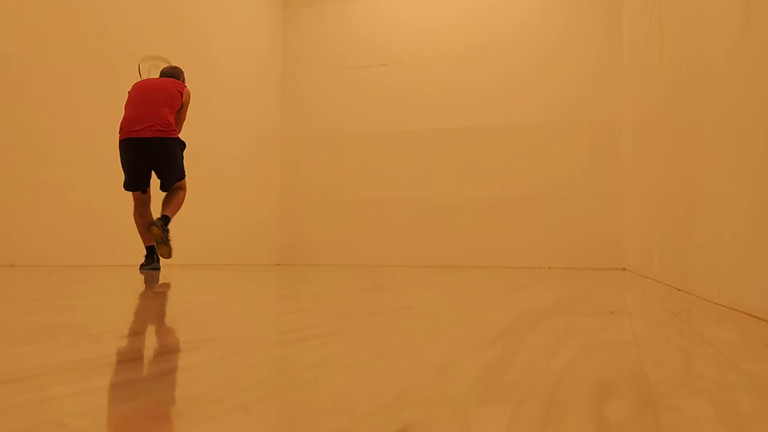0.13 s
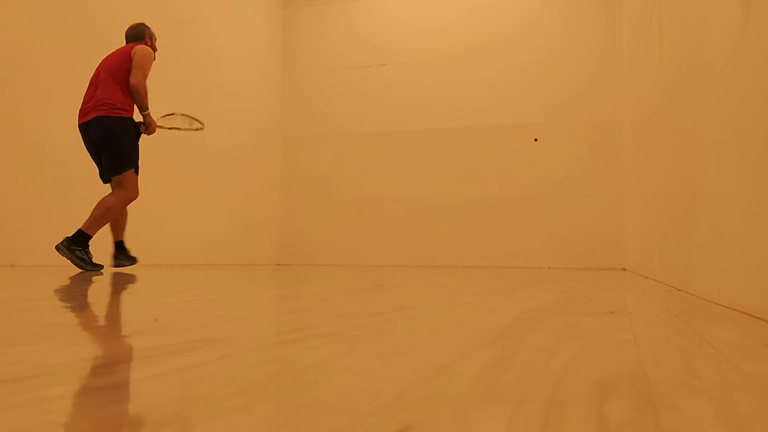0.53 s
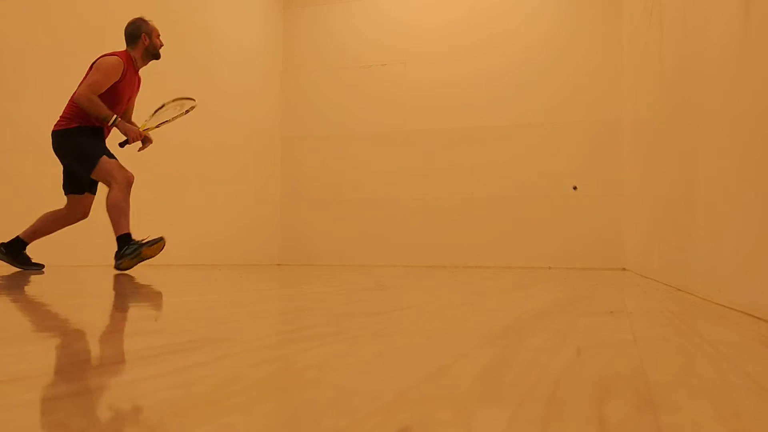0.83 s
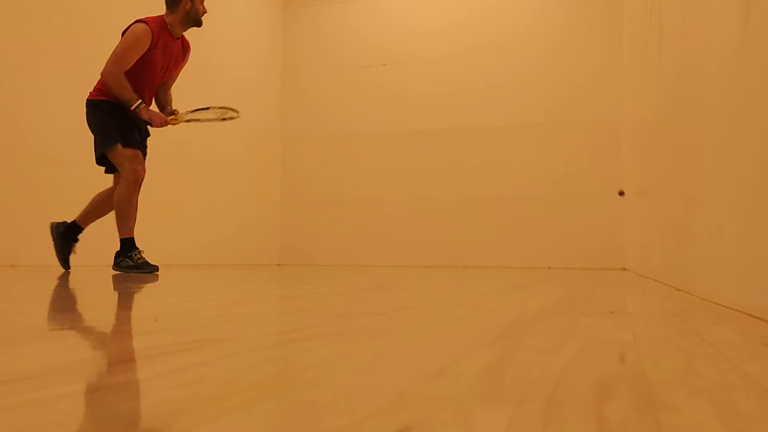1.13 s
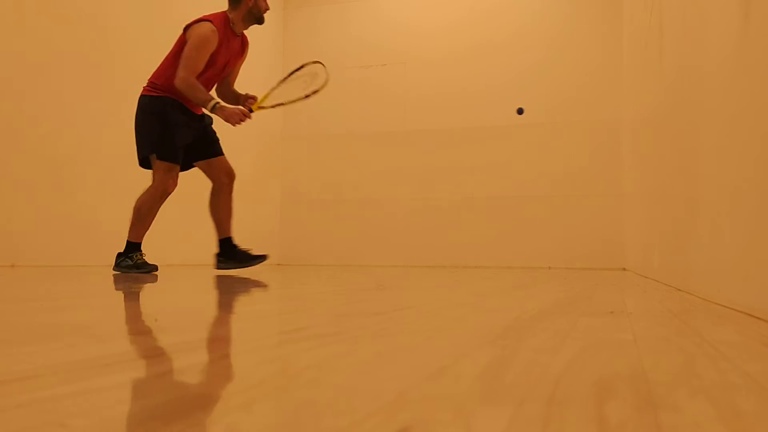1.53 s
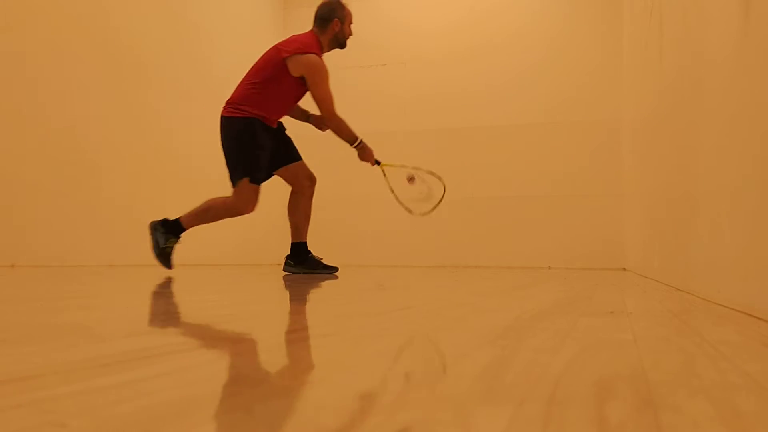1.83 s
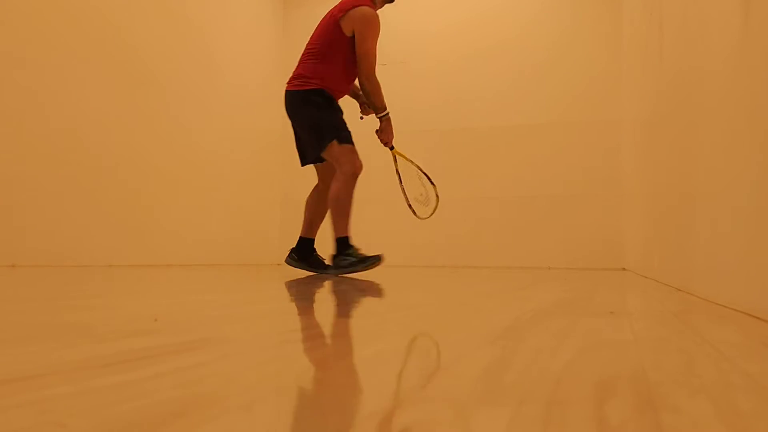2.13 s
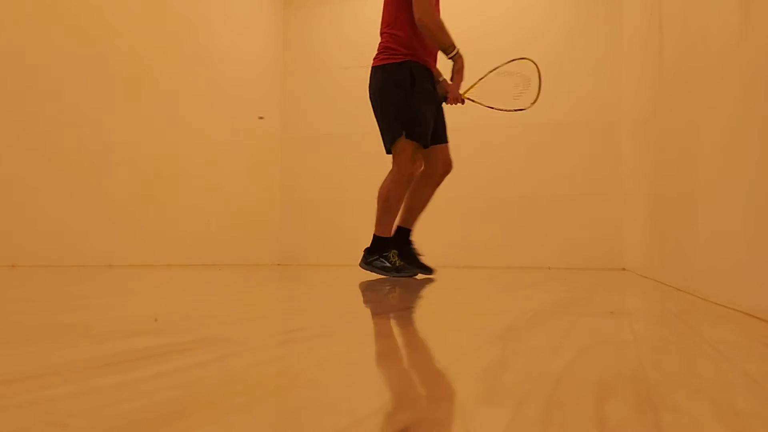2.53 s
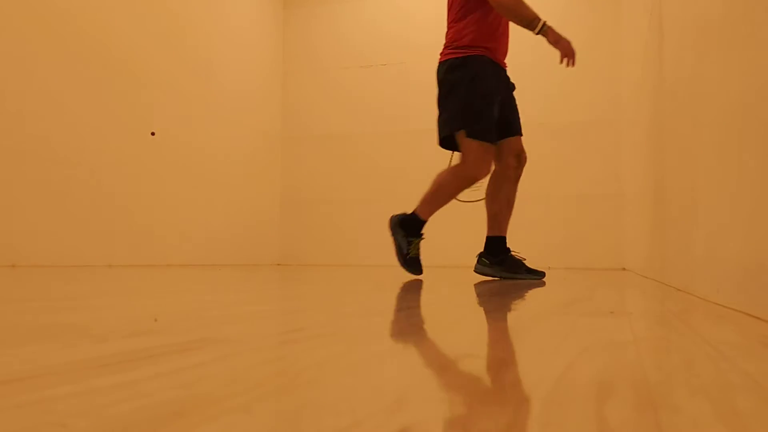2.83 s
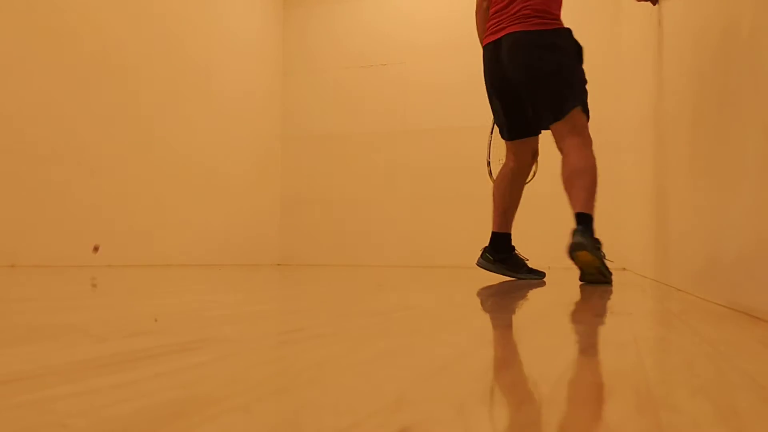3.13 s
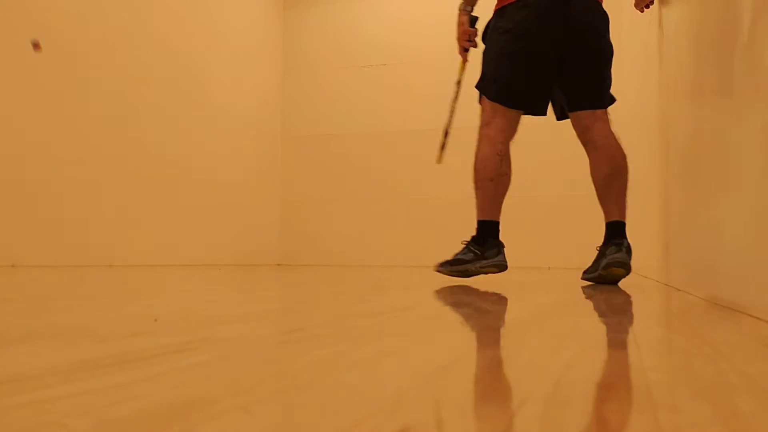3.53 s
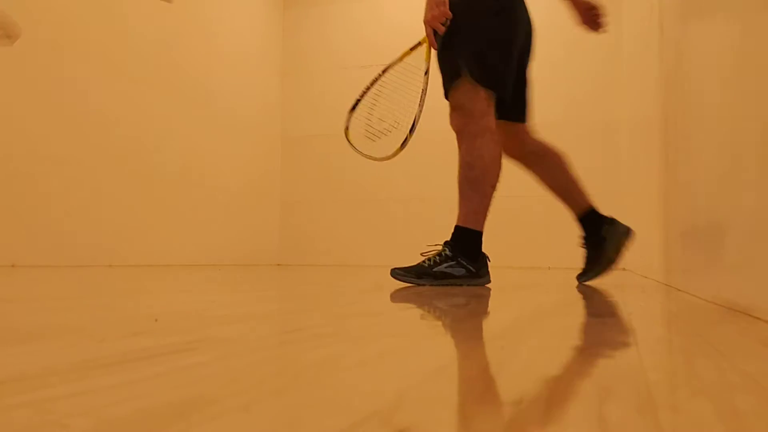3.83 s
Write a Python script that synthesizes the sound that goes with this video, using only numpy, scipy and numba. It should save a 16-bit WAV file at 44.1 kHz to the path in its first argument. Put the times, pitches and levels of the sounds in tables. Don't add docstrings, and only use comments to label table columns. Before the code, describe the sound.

Hollow rubber ball smacks walls, floor and racquet with sharp cracks echoing in a bare court

```python
import sys
import numpy as np
from scipy import signal
from scipy.fft import rfft, irfft
from scipy.io import wavfile
from scipy.ndimage import uniform_filter1d
from numba import njit

SR = 44100
rng = np.random.default_rng(int(sys.argv[2]) if len(sys.argv) > 2 else 0)


def wav_record(signal):
    frames = np.transpose(np.atleast_2d(signal))
    bounded = np.clip(frames, -1, 1)
    quanta = np.round(bounded * 32767).astype(np.int16)
    wavfile.write(sys.argv[1], SR, quanta)


def boost_factor(decibels):
    exponent = np.asarray(decibels, float) / 20
    return 10 ** exponent


N = 176400
HIT_SIZE = 4096
SOUND_M_S = 343
PORTS_M = 0.17
DIRECT_DB = -1


def curve(table, hz):
    points = np.array(table)
    return np.interp(np.log(np.maximum(hz, 1)), np.log(points[:, 0]), points[:, 1])


def colour(x, gain):
    size = x.shape[-1]
    return irfft(rfft(x) * gain(np.fft.rfftfreq(size, 1 / SR)), size)


def ring(hz, t60, size):
    t = np.arange(size) / SR
    return np.sin(2 * np.pi * hz * t) * np.exp(-np.log(1000) * t / t60)


def add(out, s, x):
    i = int(round(s * SR))
    a = max(i, 0)
    b = max(a, min(i + x.shape[-1], out.shape[-1]))
    out[..., a:b] += x[..., a - i:b - i]


def through(path, x):
    return signal.fftconvolve(path, [x], axes=1)


@njit
def mirrors(src, mic, box, ports, per_m, uneven, size):
    out, far, c = np.zeros((2, size + 2)), size / per_m, 0
    n = (far / box).astype(np.int64) + 1
    for i in range(-n[0], n[0] + 1):
        x = i * box[0] + (src[0] if i % 2 == 0 else box[0] - src[0]) - mic[0]
        for j in range(-n[1], n[1] + 1):
            y = j * box[1] + (src[1] if j % 2 == 0 else box[1] - src[1]) - mic[1]
            if x * x + y * y > far * far:
                continue
            m = int(np.sqrt(far * far - x * x - y * y) / box[2]) + 1
            for k in range(-m, m + 1):
                z = k * box[2] + (src[2] if k % 2 == 0 else box[2] - src[2]) - mic[2]
                r = np.sqrt(x * x + y * y + z * z)
                c = (c + 1) % len(uneven)
                for e in range(2):
                    p = (r * uneven[c] + (e - .5) * ports * x / r) * per_m
                    q = int(p)
                    if q < size:
                        out[e, q] += (q + 1 - p) / r
                        out[e, q + 1] += (p - q) / r
    return out[:, :size]


COURT_M = (6.1, 12.2, 6.1)
PHONE_AT_M = (3.2, .4, .2)
# (frequency [Hz], t60 [s])
COURT_T60 = [(60, 1.4), (150, 0.85), (300, 3.24), (900, 5.54), (2000, 5.36), (4000, 3.12), (7000, 1.53),
             (12000, 0.9)]


def court(at):
    tail_s, uneven_share, build_s = 2.1, 0.0007, 0.029
    r = np.linalg.norm(np.subtract(at, PHONE_AT_M))
    uneven = 1 + uneven_share * rng.standard_normal(99991)
    h = mirrors(np.array(at), np.array(PHONE_AT_M), np.array(COURT_M), PORTS_M, SR / SOUND_M_S,
                uneven, int(tail_s * SR))
    h = signal.sosfilt(signal.butter(2, 35, "high", fs=SR, output="sos"), h)
    h = r * h[:, int(r / SOUND_M_S * SR) - 12:]
    t = np.arange(h.shape[1]) / SR
    after_direct = t >= 0.0015
    build = 1 - np.exp(-(t / build_s) ** 2)
    fade_out = np.clip((t[-1] - t) / 0.3, 0, 1)
    tail = h * after_direct * build * fade_out * 6 / r
    hz, s, z = signal.stft(tail, SR, nperseg=512)
    decay = boost_factor(-60 * s / curve(COURT_T60, hz)[:, None])
    tail = signal.istft(z * decay, SR, nperseg=512)[1]
    lag = int(round((at[0] - PHONE_AT_M[0]) / r * PORTS_M / SOUND_M_S * SR / 2))
    direct = np.zeros((2, 32))
    direct[[0, 1], [12 - lag, 12 + lag]] = 1.5
    return direct, tail


def thump(hz):
    cycles = 5
    onset = 1 - np.exp(-np.arange(HIT_SIZE) / SR * hz * 6)
    return ring(hz, cycles / hz, HIT_SIZE) * onset


# (frequency [Hz], level [dB], t60 [s])
BALL_MODES = [(434, -7, 0.012), (669.6, -3.5, 0.023), (859.6, -0.5, 0.023), (1023, -1, 0.026),
              (1109, -6, 0.024)]


def ball_body(thump_db, thump_hz, ring_db):
    contact = np.hanning(40) / 14
    shell = np.zeros(HIT_SIZE)
    for m, (hz, db, t60) in enumerate(BALL_MODES):
        shell += (-1) ** m * boost_factor(db) * ring(hz, t60, HIT_SIZE)
    body = boost_factor(thump_db) * thump(thump_hz) + boost_factor(ring_db) * shell
    return np.convolve(body, contact)[:HIT_SIZE]


# (frequency [Hz], level [dB])
CRACK = [(500, -42), (1200, 11), (2000, 7), (3500, 5), (6000, -2), (10000, -6.5), (16000, -12.5)]


def crack_colour(x, tilt_db_oct):
    return colour(x, lambda f: boost_factor(curve(CRACK, f) + tilt_db_oct * np.log2(np.maximum(f, 900) / 4000)))


def crack(tilt_db_oct):
    rise_s, crack_s, smear_db, smear_s = 0.00056, 0.0025, -6.5, 0.0099
    t = np.arange(HIT_SIZE) / SR
    fall = np.exp(-(t / crack_s) ** 2) + boost_factor(smear_db) * np.exp(-t / smear_s)
    shape = (1 - np.exp(-t / rise_s)) * fall
    return crack_colour(rng.standard_normal(HIT_SIZE) * shape, tilt_db_oct)


# (time [s], thump level [dB], thump frequency [Hz], ring level [dB], crack level [dB])
HITS = [
    (-.45, -9, 370, -13.5, -27),
    (0.6651, -12.5, 293, -9.5, -22.5),
    (1.135, -19.5, 157, -32, -26.5),
    (1.5486, -43, 188, -54, -40.5),
    (1.948, -23, 240, -16, -27),
    (2.494, -11.5, 262, -13.5, -23.5),
    (3.2955, -9, 115.4, -30, -25),
    (3.808, -13, 274, -16, -31),
]
HITS_AT_M = [
    (2.1, 9.3, 1.1),
    (3.4, 11.9, 2.3),
    (4.9, 8.3, .1),
    (4.2, 6.1, .9),
    (4.4, 5.2, .1),
    (1.3, 11.8, .7),
    (1.1, 4.3, .1),
    (.7, 2.9, .1),
]
# (body [dB], crack [dB], treble tilt [dB/octave])
HIT_FILL = [(-6.5, -1, 4.5), (2.5, 4, -0.13), (-4, -1.5, -0.7), (-5, 1, 4.5), (-0.5, 0.4, 2), (6.5, 6.5, 0),
            (-6.5, -5.5, 1), (-2.5, -1, 6.5)]


def hits():
    out = np.zeros((2, N))
    click_db, tail_db = 21, -5.5
    tick = boost_factor(click_db) * (np.arange(HIT_SIZE) == 40)
    for hit, at, (wet_db, wet_crack_db, tilt) in zip(HITS, HITS_AT_M, HIT_FILL):
        s, thump_db, thump_hz, ring_db, crack_db = hit
        body = ball_body(thump_db, thump_hz, ring_db)
        direct, tail = court(at)
        near = boost_factor(DIRECT_DB) * body + boost_factor(crack_db) * crack(tilt)
        fill = boost_factor(wet_db) * body + boost_factor(crack_db + wet_crack_db) * crack_colour(tick, tilt)
        add(out, s, through(direct, near))
        add(out, s, boost_factor(tail_db) * through(tail, fill))
    return out


# (frequency [Hz], level [dB])
AIR = [(30, -1.5), (100, -2.5), (400, -8), (1000, -22.5), (2000, -32.5), (5000, -38), (9000, -52.5),
       (15000, -29)]


def air():
    air_db = -33.5
    mid = rfft(rng.standard_normal(N))
    side = rfft(rng.standard_normal(N))
    f = np.fft.rfftfreq(N, 1 / SR)
    alike = np.sinc(2 * f * PORTS_M / SOUND_M_S)
    both = mid * np.sqrt(1 + alike) + side * np.sqrt(1 - alike) * np.array([[1], [-1]])
    x = irfft(boost_factor(curve(AIR, f)) * both, N)
    return x / x.std() * boost_factor(air_db)


# (time [s], length [s], level [dB])
SCUFFS = [
    (0., 0.086, -40.5),
    (0.48, 0.17, -54),
    (1.228, 0.058, -43),
    (1.851, 0.098, -47),
    (2.315, 0.053, -53),
    (3.2, 0.072, -52),
]


def scuffs():
    centre_hz, width_hz = 6000, 14000
    t = np.arange(N) / SR
    rub = colour(rng.standard_normal(N),
                 lambda f: 1 / (1 + ((f - centre_hz) / width_hz) ** 2) * f / (f + 1500))
    rub *= boost_factor(2.4 * uniform_filter1d(rng.standard_normal(N), size=100) * 10)
    drag = sum(boost_factor(db) * np.sin(np.pi * np.clip((t - s) / n, 0, 1)) for s, n, db in SCUFFS)
    return rub * drag


# (frequency [Hz], level [dB], t60 [s])
TAG_MODES = [(8640, -6.5, 0.85), (9370, -5.5, 0.57), (11100, -6, .5), (12590, -2, .5), (13670, 0, .4),
             (15600, 13, 0.28)]
# (time [s], level [dB])
TINKLES = [
    (0.018, -40),
    (.5, -54),
    (3.498, -58),
]


def tag():
    out, split_hz = np.zeros((2, N)), 80
    tinkle = np.zeros(SR)
    for hz, db, t60 in TAG_MODES:
        tinkle += boost_factor(db) * (ring(hz, t60, SR) + 0.56 * ring(hz + split_hz, t60, SR))
    for s, db in TINKLES:
        add(out, s, boost_factor(db) * tinkle)
    return out


# (time [s], level [dB], frequency [Hz])
STEPS = [
    (0.489, -26, 107),
    (1.209, -16.5, 126),
    (2.281, -22, 142),
    (2.851, -10.5, 134),
    (3.55, -22.5, 130),
]


def footfalls():
    out = np.zeros(N)
    for s, db, hz in STEPS:
        add(out, s, boost_factor(db) * thump(hz))
    return out


FEET_AT_M = (2.6, 6.7, .1)


def shoes():
    dry = scuffs() + footfalls()
    direct, tail = court(FEET_AT_M)
    return through(direct, dry)[:, :N] + boost_factor(-10.5) * through(tail, dry)[:, :N]


# (time [s], level [dB], crack level [dB], treble tilt [dB/octave], left-right [dB])
ECHOES = [(.676, -4, -3, -3, 13), (.684, -3, -2.5, -4, -12), (.6915, -6, -5.5, 3.5, 6),
          (.699, -7.5, -13, -6, .1), (.713, -2.5, -11, -2, -2), (0.7214, -15, -9.5, -0.5, -3),
          (0.735, -15, -8.5, -2, 3), (.7445, 1.5, -5.5, 0, -2.1), (.765, -3, -4, -3, -2),
          (1.155, .1, 1.5, -3.5, 0.5), (1.197, -1, -3.5, -2, -4), (1.579, 6, 4.5, -4, -2.5),
          (1.956, -4, -6.5, -8.5, 4), (1.971, -12, 2.5, -1, 1), (1.977, -11, -2, .1, -2),
          (1.989, -15, -11, -4, 2), (2.005, -9, -2.5, -4, 1), (2.015, -15, -1.5, 0, 3),
          (2.5029, -1, 9.5, 0, -4.5), (2.514, 0, -1, -6, 4), (2.5298, -4, -0.5, 0.5, 2.1),
          (2.544, -5, -10.5, 7, 12), (2.548, -13, -14, -3, -5), (2.5889, -1, 3, 2, -3),
          (2.596, 1, 5.7, 0, -10.5), (2.6727, -15, -1.5, -0.5, -4), (2.684, -14, -0.5, -3.5, -2.5),
          (3.305, -15, -8, 4, 0.5), (3.317, -9.5, -2.5, 1, -1), (3.321, -9, -6, -3, -2),
          (3.327, -11.5, -17, -2.5, -4), (3.338, -10, -11, 0, 1), (3.344, -5, -15, -3, -3),
          (3.378, -1.5, -12, 3, .1), (3.827, -5.5, -5, 3, -1), (3.842, -2, -14, 0, -6),
          (3.859, -4, -5, 1, -3)]


def echoes():
    out = np.zeros((2, N))
    starts = np.array(HITS)[:, 0]
    directs = [court(at)[0] for at in HITS_AT_M]
    bodies = [ball_body(*hit[1:4]) for hit in HITS]
    for s, db, echo_crack_db, echo_tilt, pan_db in ECHOES:
        k = np.searchsorted(starts, s) - 1
        slap = boost_factor(HITS[k][4] + echo_crack_db) * crack(HIT_FILL[k][2] + echo_tilt)
        echo = boost_factor(db + DIRECT_DB) * bodies[k] + slap
        add(out, s, through(directs[k], echo) * boost_factor(np.array([[pan_db], [-pan_db]]) / 2))
    return out


# (time [s], frequency [Hz], level [dB], t60 [s])
SNAPS = [
    (2.5005, 3570, 5, 0.02),
    (2.503, 5000, -6, 0.014),
    (2.588, 4840, -11, .014),
    (2.672, 4900, -18, .02),
]


def snaps():
    out = np.zeros((2, N))
    onset = 1 - np.exp(-np.arange(HIT_SIZE) / SR / 0.0007)
    for s, hz, db, t60 in SNAPS:
        add(out, s, boost_factor(db - 12) * ring(hz, t60, HIT_SIZE) * onset)
    return out


def scene():
    return hits() + air() + tag() + shoes() + echoes() + snaps()


# (frequency [Hz], level [dB])
SIDE_LIFT = [(60, -8), (180, -13.5), (350, -3.5), (700, 0.5), (1200, 7), (1800, -4), (2600, 0.5)]


def widen(dry):
    mid = dry.mean(axis=0)
    side = colour((dry[0] - dry[1]) / 2, lambda f: boost_factor(curve(SIDE_LIFT, f)))
    return mid + side, mid - side


def port(x, hz, width_hz, db, roll_hz, mid_db):
    def law(f):
        resonance = db / (1 + (2 * (f - hz) / width_hz) ** 2)
        roll = -16 * np.log2(1 + (f / roll_hz) ** 6) / (1 + f / 2960.0)
        lift = mid_db * np.exp(-np.log(np.maximum(f, 1) / 650) ** 2 / 0.45)
        return boost_factor(resonance + roll + lift)
    return colour(x, law)


# (frequency [Hz], width [Hz], level [dB])
PORTS = [(6730, 1900, 20), (5285, 1430, 19)]
ROLL_HZ = (8400, 6900)


def two_ports(left, right):
    left_mid_db = 4.5
    return np.array([port(left, *PORTS[0], ROLL_HZ[0], left_mid_db / 2),
                     port(right, *PORTS[1], ROLL_HZ[1], -left_mid_db / 2)])


@njit
def follow(x, rise, fall):
    e, out = .03, np.empty(len(x))
    for i in range(len(x)):
        e += (x[i] - e) * (rise if x[i] > e else fall)
        out[i] = e
    return out


def gain_control(x):
    top_db, ratio, attack_s, release_s = -7.5, 1.5, 0.00034, 0.07
    level = follow(np.abs(x).max(axis=0), 1 / (attack_s * SR), 1 / (release_s * SR))
    return x * np.minimum(boost_factor(top_db) / level, 1) ** (1 - 1 / ratio)


def band_limit(x):
    return signal.sosfilt(signal.butter(12, 16520, fs=SR, output="sos"), x)


def record(dry):
    ceiling, top_hz = 0.8, 16400
    x = gain_control(two_ports(*widen(dry)))
    x = ceiling * np.tanh(x / ceiling)
    x = signal.sosfilt(signal.ellip(8, .2, 70, top_hz, fs=SR, output="sos"), x)
    return band_limit(x)


dry = scene()
out = record(dry)
wav_record(out)
```